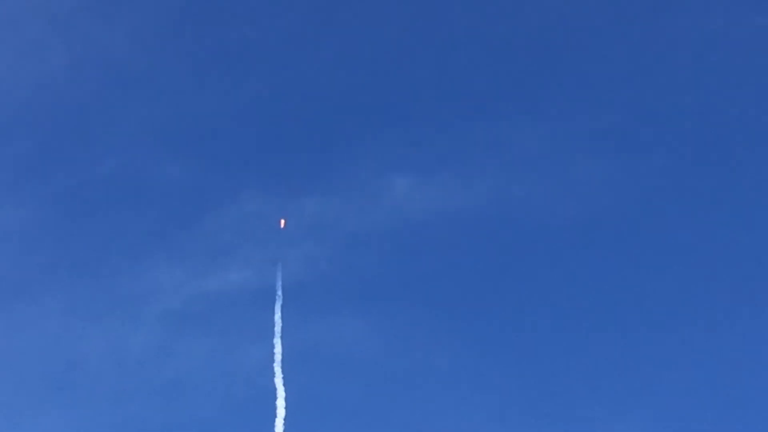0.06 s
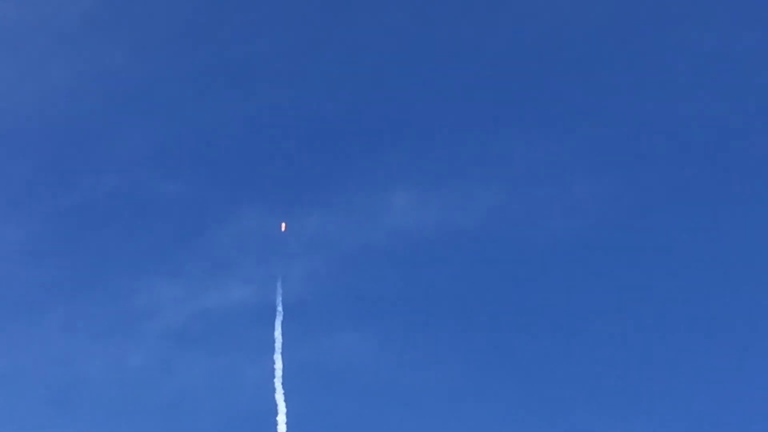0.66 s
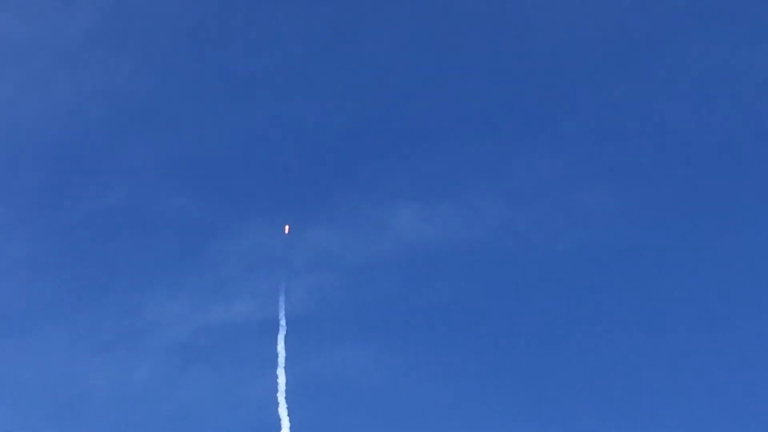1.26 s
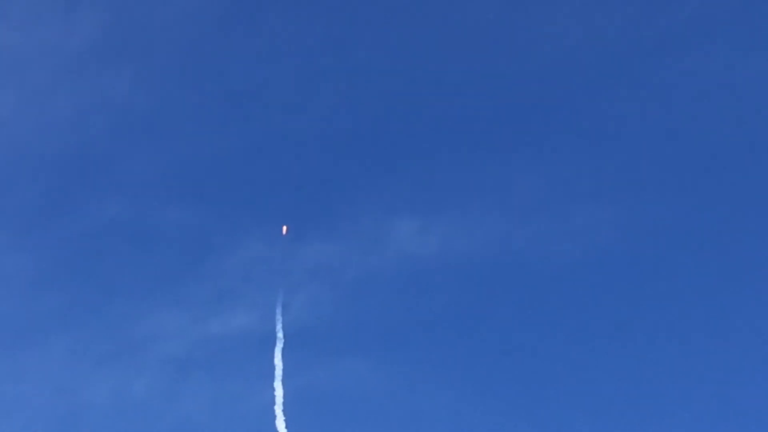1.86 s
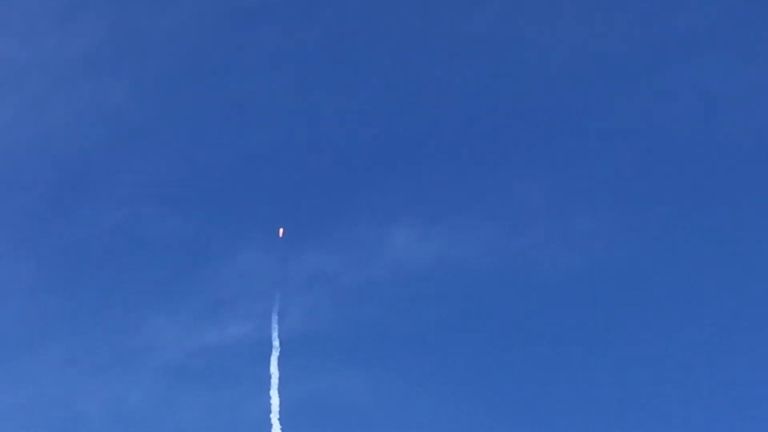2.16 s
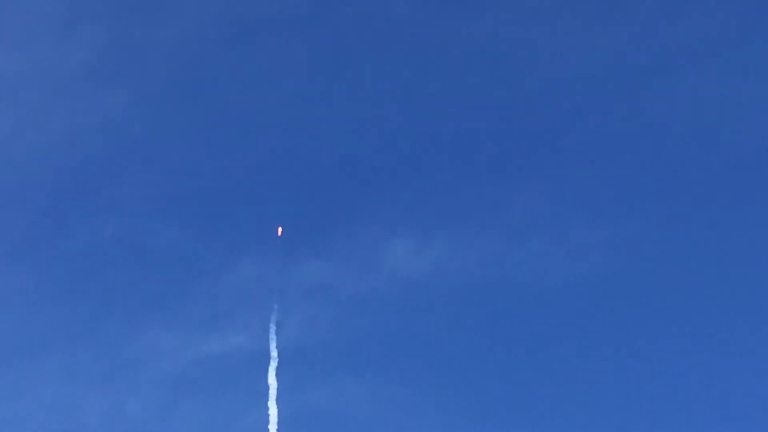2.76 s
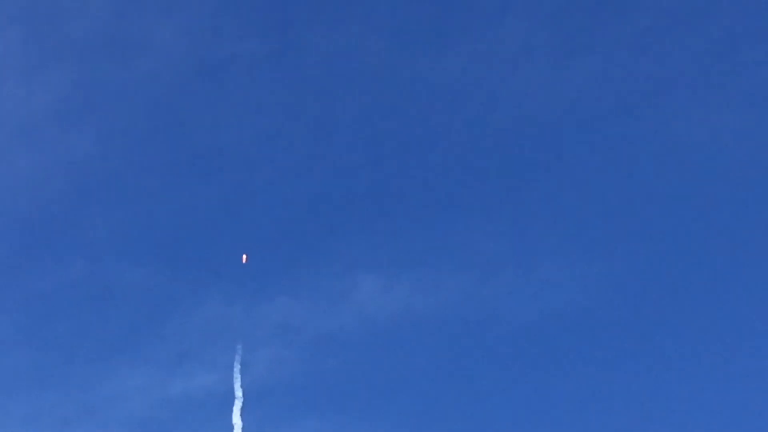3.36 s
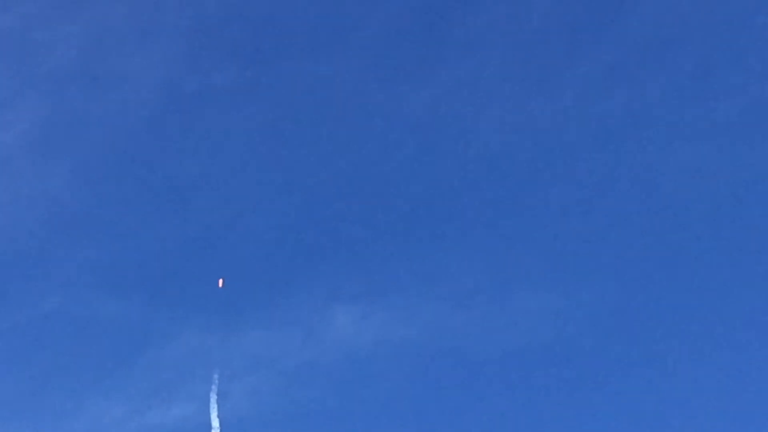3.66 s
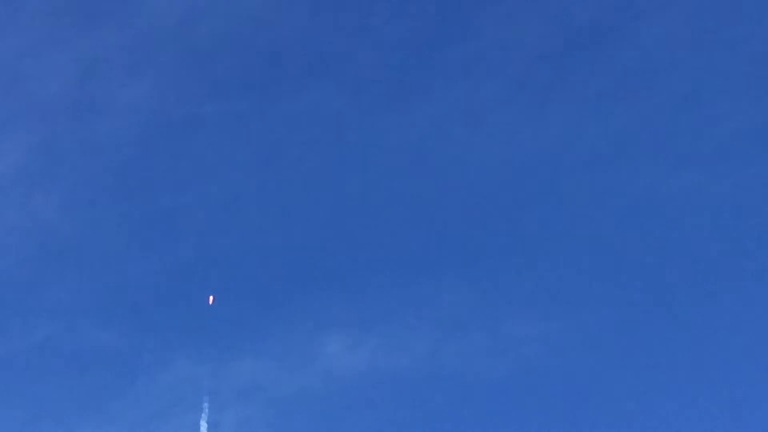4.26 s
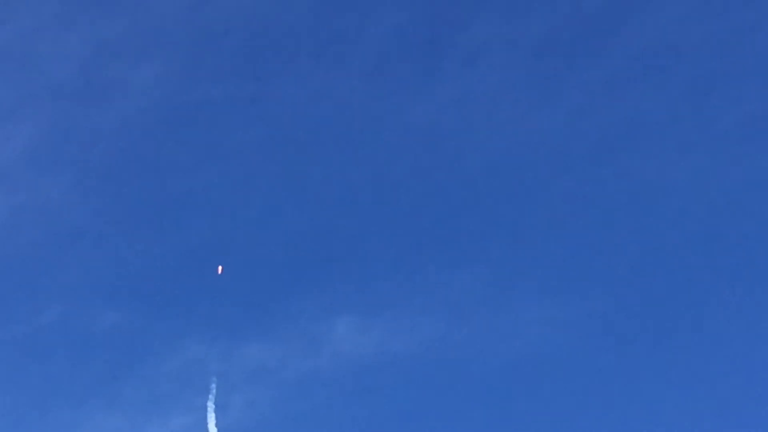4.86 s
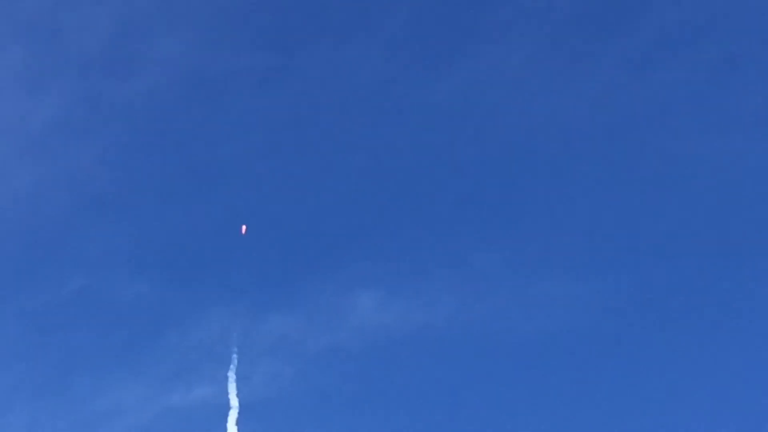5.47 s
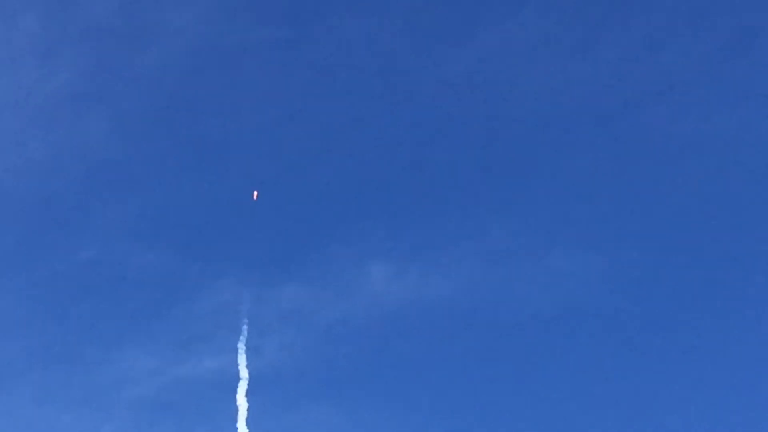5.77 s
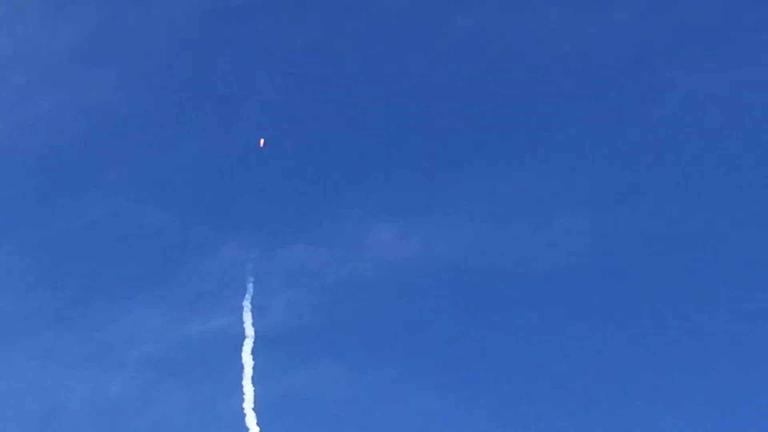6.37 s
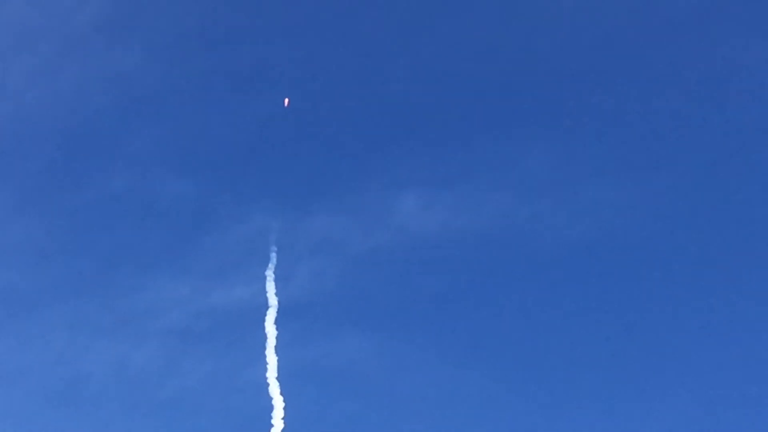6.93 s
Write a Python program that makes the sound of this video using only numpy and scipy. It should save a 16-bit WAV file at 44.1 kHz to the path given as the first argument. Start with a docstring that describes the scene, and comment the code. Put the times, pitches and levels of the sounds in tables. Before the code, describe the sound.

A distant rocket's low, uneven rumble swells outdoors while a nearer vehicle passes with a soft tyre hiss and faint ticks sound close by.

```python
"""A far rocket starts as a faint, low, lumpy rumble, its exhaust roar stripped of treble by miles of air.
Around 2-3 s a nearer vehicle passes with a hiss of tyre tread and a short exhaust boom.
From 4 s the rocket is at full strength over a deep throb, while the engine sinks and drones away.
The roar eases near 7 s. Faint ticks and small rustles sound close by all the way through."""
import sys
import numpy as np
from scipy import signal
from scipy.fft import rfft, irfft
from scipy.io import wavfile
from scipy.ndimage import uniform_filter1d

SR = 44100
rng = np.random.default_rng(int(sys.argv[2]) if len(sys.argv) > 2 else 0)


def wav_out(sig):
    """Save sig, one row per channel (or a flat mono array), as 16-bit PCM at SR to the path in sys.argv[1]."""
    wavfile.write(sys.argv[1], SR, np.round(np.clip(np.atleast_2d(sig).T, -1, 1) * 32767).astype(np.int16))


N = 317520
TIME = np.arange(N) / SR

# bed of still air and microphone hiss: f/Hz, level/dB
AIR_COLOUR = [(300, -7), (1500, 2), (3200, -3), (4400, -7.5), (5000, -9), (6500, -10.5), (7500, -14.5),
              (9500, -15), (11000, -17.2), (15500, -22)]
# close scuffs: middle t/s, level/dB, length/s, centre f/Hz, width/Hz
RUSTLE_CUES = [(.83, -77, 0.07, 6000, 700), (1.513, -71, 0.12, 4300, 3000), (3.89, -67, 0.027, 3300, 1500),
               (4.091, -70, 0.034, 4000, 3500), (5.326, -70, 0.051, 2970, 4000),
               (6.862, -63, .018, 3360, 603), (6.874, -65, 0.051, 2310, 4200)]
# close knocks: t/s, peak level/dB, centre f/Hz, width before spreading/Hz, 60 dB decay/s
TICK_CUES = [(0.462, -57.5, 6000, 5000, .025), (0.628, -60, 7000, 5000, .018),
             (.6445, -43, 1310, 1200, 0.02), (0.7248, -42, 2180, 520, 0.028), (.857, -53, 4770, 3000, .03),
             (2.395, -47.5, 3400, 1500, .028), (2.4923, -60, 11500, 4000, .014),
             (2.6262, -37, 1400, 1300, 0.019), (3.278, -60, 13800, 4500, .008),
             (3.436, -58, 8200, 3500, .013), (3.8153, -41, 1081, 750, .018),
             (4.282, -44.5, 2220, 696, .022), (4.5971, -56, 1800, 980, .012),
             (5.0273, -63, 8500, 3000, .014), (5.212, -62, 4000, 450, .02), (5.306, -54, 3400, 1200, .02),
             (5.333, -54, 3020, 1500, .015), (5.41, -52.5, 2700, 2200, .018),
             (5.8046, -54.5, 2800, 4500, .018), (6.137, -56.5, 7200, 3500, .018),
             (6.4753, -61.5, 8500, 5040, .018), (6.868, -51, 3460, 900, .018),
             (7.0885, -62.5, 5700, 400, .015), (7.125, -43, 1204, 200, 0.03),
             (7.189, -52, 3030, 350, 0.017)]
# fader of the tread hiss: t/s, level/dB
TYRE_FADER = [(0, -54.5), (.55, -57), (1.05, -58), (1.5, -53.5), (1.85, -51.5), (2.3, -51.3), (2.75, -52.5),
              (3.15, -54.5), (3.55, -59.5), (4.1, -62.5), (4.9, -63.5), (5.3, -64.5), (6.6, -66.5),
              (7.2, -64)]
# tone of the tread hiss: f/Hz, level/dB
TREAD_COLOUR = [(150, -11.5), (280, -4), (470, 0), (680, -1.5), (900, -1), (1110, -0.5), (1300, -2),
                (2000, -4.5), (2700, -13.5), (4300, -21), (5200, -24.5), (7000, -31.5), (10000, -38),
                (15000, -54)]
# the tyres' hollow drone, sinking as they leave: t/s, level/dB, centre f/Hz
HOLLOW_DRONE = [(0, -62.5, 1093), (1.4, -76, 1100), (2.4, -62, 1132), (3.2, -60.5, 1104), (3.7, -68, 1002),
                (4.1, -69.5, 799.6), (4.9, -69.5, 800), (5.3, -79, 679), (7.2, -76.5, 652)]
# the engine going by: t/s, firing f/Hz, level/dB, tail turned to the listener/0-1
ENGINE_PASS = [(0, 89, -63, 0), (1.1, 87, -54, 0.1), (2.2, 85, -49, 0.04), (3.0, 84.8, -48.5, 0.25),
               (4.0, 84.4, -51, 0.15), (4.7, 83.6, -50.5, 0), (5.4, 82.2, -50, 0.8), (6.2, 81, -55.5, 1),
               (6.6, 80.6, -70.5, 0.93), (7.2, 80, -62.5, 0.9)]
# engine harmonics: multiple of the firing rate, front level/dB, rear level/dB
FIRING_ORDERS = [(2, 5, -1.5), (3, -7, -8), (4, -10, -9.5), (5, -18, -9), (6, -25.5, -24)]
# fader of the vehicle's exhaust boom: t/s, level/dB
BOOM_FADER = [(0, -58.5), (1.2, -62.5), (1.8, -51), (2.2, -46.5), (2.5, -62), (3.2, -65.5), (4.2, -66.5),
              (7.2, -88)]
# fader of the body of the rocket's roar: t/s, level/dB
ROAR_FADER = [(0, -41.5), (0.6, -42.5), (1.0, -40.5), (2.2, -36.5), (2.9, -34), (3.35, -31.5),
              (3.72, -32.5), (4.0, -26), (4.6, -26.5), (5.35, -26), (6.1, -27), (6.7, -26.5), (7.2, -31)]
# fader of the deep throb beneath it: t/s, level/dB
THROB_FADER = [(0, -49), (2.3, -50.7), (3.05, -48), (3.6, -40.5), (4.15, -49.5), (4.4, -39.5), (5.35, -36),
               (6.5, -37), (7.2, -41)]
# tone of the roar while faint: f/Hz, level/dB
FAINT_COLOUR = [(21, -57), (35, -16), (70, -2), (92, 2.5), (140, -8), (199, -13.5), (257, -15),
                (380, -25.5), (490, -54), (840, -120)]
# tone of the roar at full strength: f/Hz, level/dB
FULL_COLOUR = [(21, -41.5), (35, -8.5), (70, 0), (97, 0.5), (165, -14.5), (226, -29), (297, -33),
               (332, -37.5), (371, -48.5), (390, -42), (510, -70), (860, -120)]
# crossfade between those tones: t/s, share of the full colour/0-1
ROAR_CROSSFADE = [(0, 0), (2.3, 0), (3.2, 0.76), (4.1, 0.98), (7.2, 0.91)]
# chance swells and dips in the low rumble's level: t/s, swell/dB, dip/dB
SWELLS_AND_DIPS = [(.35, 4, 6), (.89, 4.5, 4), (1.03, 4.5, -1), (2.37, 5, 1), (2.8, 2.5, 1.5),
                   (3.03, 2.5, 9), (3.39, 5, 1), (3.54, 4.5, 4), (3.9, 2.5, 2), (4.09, 2.5, 1),
                   (4.28, 3, 6.5), (4.63, 2, 6.5), (4.83, 4.5, 0.5), (5.18, 3.5, 5.5), (5.44, 5.5, -0.5),
                   (5.77, 4, 1.5), (5.97, 2.5, 0.5), (6.28, 0.5, 3), (6.49, 0.5, 8), (6.889, 0, 12.5)]
# bumps and dips of the microphone's port and case: f/Hz, width/Hz, level/dB
PORT_EQ = [(653, 64, 2.5), (2690, 120, -1), (3180, 350, 1), (3600, 200, -1.5), (4430, 200, 1),
           (4900, 160, -3), (10360, 410, -5.5)]


def gain_of(db):
    """Decibels to gain."""
    return 10 ** (np.asarray(db) / 20)


def unit_rms(x):
    """Scales to an rms of 1."""
    return x / np.sqrt(np.mean(x ** 2) + 1e-20)


def curves(rows):
    """Each column of a time table at every sample."""
    s, *columns = np.transpose(rows)
    return [np.interp(TIME, s, c) for c in columns]


def add(mix, s, sound):
    """Mixes a sound in at time s."""
    part = mix[max(round(s * SR), 0):][:len(sound)]
    part += sound[:len(part)]


def coloured(x, points):
    """Shapes x with an EQ curve of (f/Hz, level/dB) points, at an rms of 1."""
    hz, db = np.transpose(points)
    f = np.fft.rfftfreq(len(x), 1 / SR)
    eq_db = np.interp(np.log(f + 1), np.log(hz + 1), db)
    return unit_rms(irfft(rfft(x) * gain_of(eq_db), len(x)))


def band(x, hz, width_hz):
    """Passes x through one resonance with steep skirts, at an rms of 1."""
    f = np.fft.rfftfreq(len(x), 1 / SR)
    return unit_rms(irfft(rfft(x) / (1 + ((f - hz) / width_hz) ** 2) ** 5, len(x)))


def below(x, hz):
    """The part of x under a frequency."""
    return signal.sosfiltfilt(signal.butter(4, hz, fs=SR, output="sos"), x)


def drift(rate_hz):
    """A smooth random wobble with an rms of 1."""
    slow_t = TIME[::20]
    f = np.fft.rfftfreq(len(slow_t), slow_t[1])
    spectrum = rfft(rng.standard_normal(len(slow_t))) * np.exp(-(f / rate_hz) ** 2)
    return np.interp(TIME, slow_t, unit_rms(irfft(spectrum, len(slow_t))))


def levelled(x, smooth_s, evenness):
    """Compresses the slow swells of x and leaves its fast churning, at an rms of 1."""
    size = int(smooth_s * SR)
    power = uniform_filter1d(uniform_filter1d(x ** 2, size), size)
    return unit_rms(x / (abs(power) + 1e-9) ** (evenness / 2))


def still_air(level_db=-70):
    """A quiet, steady bed of outdoor air and microphone hiss."""
    return gain_of(level_db) * coloured(rng.standard_normal(N), AIR_COLOUR)


def crackle(base_db=-65, spread_db=2.5, decay_s=0.003, db_per_octave=-4.5, count=420):
    """A scatter of barely audible ticks, the higher the weaker."""
    out, t = np.zeros(N), np.arange(1024) / SR
    for when, pitch, size in rng.random((count, 3)):
        octaves = 2.8 * pitch
        hz = 1800 * 2 ** octaves
        burst = rng.standard_normal(len(t)) * np.exp(-t / decay_s)
        tick = band(np.roll(burst, len(t) // 8), hz, .5 * hz)
        accent_db = spread_db * min(-np.log(1 - size), 3)
        peak_db = base_db + db_per_octave * octaves + accent_db
        add(out, when * TIME[-1], gain_of(peak_db) * tick / abs(tick).max())
    return out


def rustles(grain_db=3):
    """Short close scuffs: soft swells of noise, roughened by a fast flutter."""
    out = np.zeros(N)
    for s, db, length_s, hz, width_hz in RUSTLE_CUES:
        swell = gain_of(db) * np.exp(-2 * ((TIME - s) / length_s) ** 2)
        out += swell * band(rng.standard_normal(N), hz, width_hz)
    return out * gain_of(grain_db * drift(250))


def ticks(spread=1.8, rise_s=0.0017):
    """Tiny dry knocks: each a soft-edged burst dying fast through one resonance."""
    out, t = np.zeros(N), np.arange(4096) / SR
    lead = len(t) // 8  # room for the filter to ring ahead of the hit
    for s, peak_db, hz, width_hz, t60 in TICK_CUES:
        envelope = (1 - np.exp(-t / rise_s)) * gain_of(-60 * t / t60)
        burst = rng.standard_normal(len(t)) * envelope
        tick = band(np.roll(burst, lead), hz, spread * width_hz)
        add(out, s - lead / SR, gain_of(peak_db) * tick / abs(tick).max())
    return out


def shimmering(hiss, patch_db=2.5):
    """Narrow bands of the hiss swell and fade in short patches, least in the top treble."""
    hz, _, spectra = signal.stft(hiss, SR, nperseg=1024, noverlap=768)
    patch = np.outer(np.hanning(7), np.hanning(15))  # bands by frames
    patches = unit_rms(signal.fftconvolve(rng.standard_normal(spectra.shape), patch, "same"))
    depth_db = patch_db / (1 + (hz[:, None] / 10000) ** 2)
    gain = gain_of(depth_db * patches)
    gain /= np.sqrt(np.mean(gain ** 2, axis=1, keepdims=True))
    return signal.istft(spectra * gain, SR, nperseg=1024, noverlap=768)[1][:N]


def tyres(trim_db=0.08, flutter_db=.5, grit_db=1, drone_width_hz=210,
          bright_db=0.74, dull_db=-1, pass_s=2.7, pass_width_s=.2):
    """Gritty tread hiss, brightest on the approach, with a fuzzy drone inside it."""
    hiss = coloured(rng.standard_normal(N), TREAD_COLOUR)
    body = below(hiss, hz=2300)
    gone = .5 + .5 * np.tanh((TIME - pass_s) / pass_width_s)
    treble_db = bright_db + gone * (dull_db - bright_db)
    treble = (hiss - body) * gain_of(treble_db + grit_db * drift(18))
    drone_db, drone_hz = curves(HOLLOW_DRONE)
    phase = 2 * np.pi * np.cumsum(drone_hz) / SR
    # a narrow band of noise riding the gliding pitch
    drone = drift(drone_width_hz) * np.cos(phase) + drift(drone_width_hz) * np.sin(phase)
    hiss_db = curves(TYRE_FADER)[0] + trim_db + flutter_db * drift(23)
    return gain_of(hiss_db) * (body + treble) + gain_of(drone_db) * drone


def engine(trim_db=-1, waver=0.0032, fading_db=2.0):
    """Firing orders sink and turn buzzier as the vehicle leaves; each fades in and out on its own."""
    firing_hz, level_db, behind = curves(ENGINE_PASS)
    firings = np.cumsum(firing_hz * (1 + waver * drift(8))) / SR
    drone = np.zeros(N)
    for order, front_db, rear_db in FIRING_ORDERS:
        order_db = front_db + behind * (rear_db - front_db) + fading_db * drift(13)
        drone += gain_of(order_db) * np.sin(2 * np.pi * (order * firings + rng.random()))
    return gain_of(level_db + trim_db) * drone


def exhaust_boom():
    """The vehicle's exhaust booms in one low band as it goes by."""
    return gain_of(curves(BOOM_FADER)[0]) * band(rng.standard_normal(N), hz=252, width_hz=70)


def swells_and_dips(swell_half_s=0.029, dip_half_s=0.019, dip_lead_s=0.053):
    """Brief chance swells and dips in the low rumble's level, in dB."""
    lift_db = np.zeros(N)
    for s, swell_db, dip_db in SWELLS_AND_DIPS:
        lift_db += swell_db * np.exp(-((TIME - s) / swell_half_s) ** 2)
        lift_db -= dip_db * np.exp(-((TIME - s + dip_lead_s) / dip_half_s) ** 2)
    return lift_db


def rocket(body_trim_db=-0.42, throb_trim_db=1.0, edge_trim_db=-.5, dull_from_s=5.13, dull_db_per_s=1.7):
    """Exhaust turbulence, dulled by miles of air, rumbles unevenly and deepens as it grows."""
    turbulence = rng.standard_normal(N)
    full = curves(ROAR_CROSSFADE)[0]
    roar = (1 - full) * coloured(turbulence, FAINT_COLOUR) + full * coloured(turbulence, FULL_COLOUR)
    # the upper edge dulls late in the climb
    edge = roar - below(roar, hz=135)
    edge_db = edge_trim_db - dull_db_per_s * np.maximum(TIME - dull_from_s, 0)
    roar += (gain_of(edge_db) - 1) * edge
    # the largest eddies throb at their own pace beneath the body of the roar
    deep = below(roar, hz=62)
    throb = levelled(deep, smooth_s=0.044, evenness=.75)
    body = levelled(roar - deep, smooth_s=0.074, evenness=0.78)
    throb_db = curves(THROB_FADER)[0] + throb_trim_db
    body_db = curves(ROAR_FADER)[0] + swells_and_dips() + body_trim_db
    return gain_of(body_db) * body + gain_of(throb_db) * throb


def scene():
    """Mono mix of quiet air, rocket, road and small close sounds."""
    air = still_air()
    rumble = rocket()
    hiss = shimmering(tyres() + air)
    return (rumble + hiss + engine() + exhaust_boom() + ticks() + rustles() + crackle())[None]


def record(dry, low_cut_hz=39, high_cut_hz=15750):
    """The microphone's port colour between steep low and high cuts."""
    f = np.fft.rfftfreq(N, 1 / SR)
    port_db = sum(db * np.exp(-((f - hz) / width) ** 2) for hz, width, db in PORT_EQ)
    low_cut = 1 / np.sqrt(1 + (low_cut_hz / (f + 1)) ** 10)
    heard = irfft(rfft(dry) * gain_of(port_db) * low_cut, N)
    high_cut = signal.firwin(511, high_cut_hz, window=("kaiser", 9), fs=SR)
    return signal.oaconvolve(heard, high_cut[None], "same")


dry = scene()
out = record(dry)
wav_out(out)
```